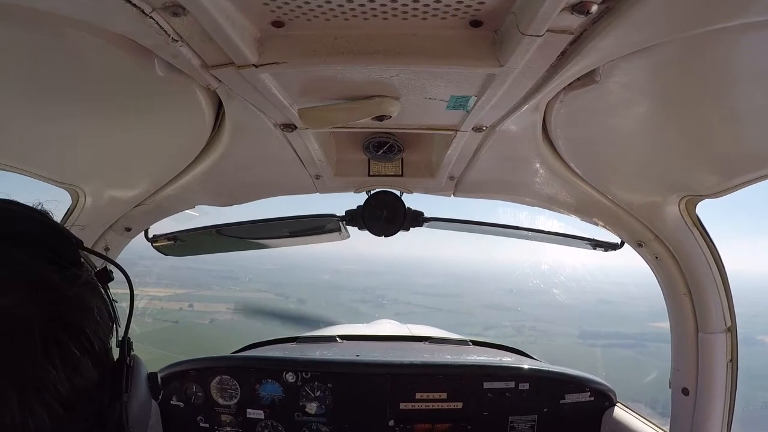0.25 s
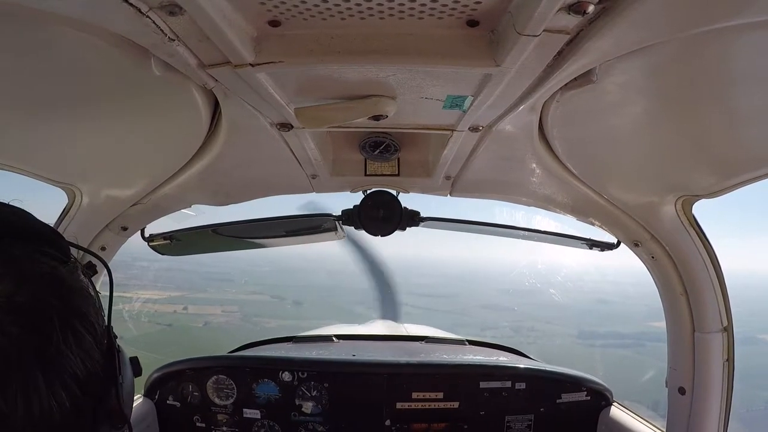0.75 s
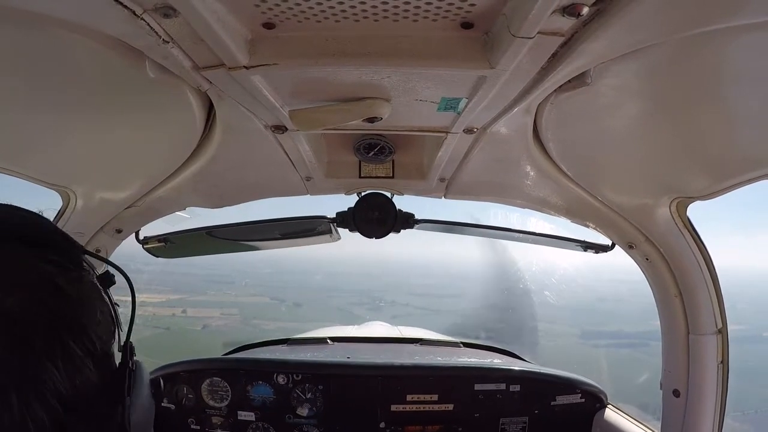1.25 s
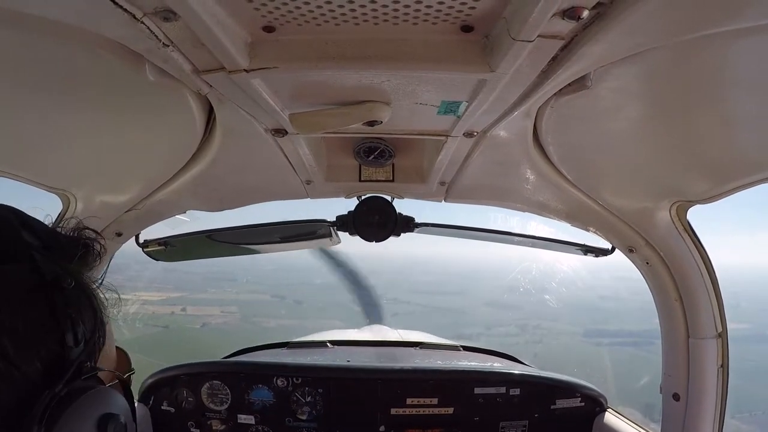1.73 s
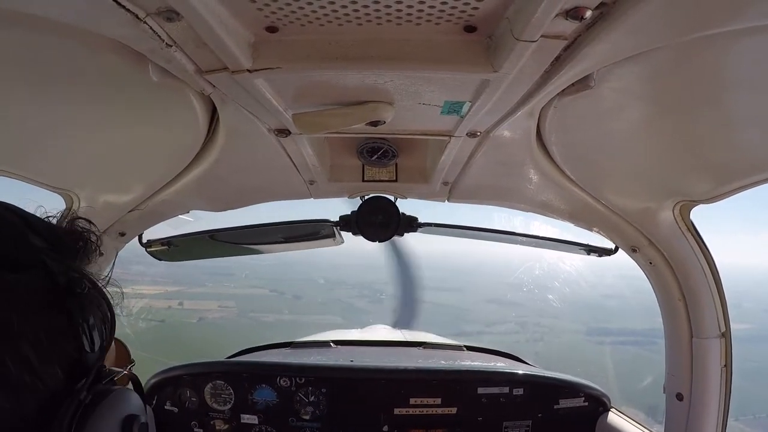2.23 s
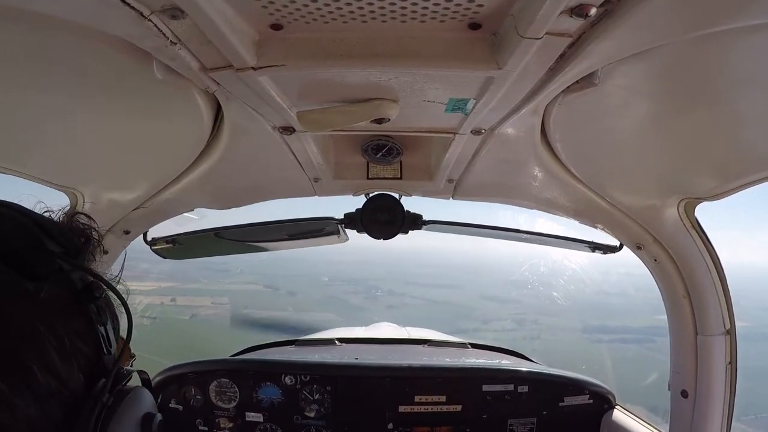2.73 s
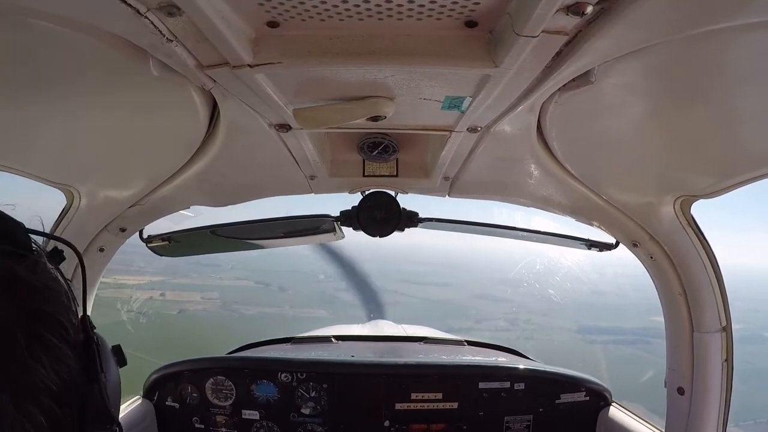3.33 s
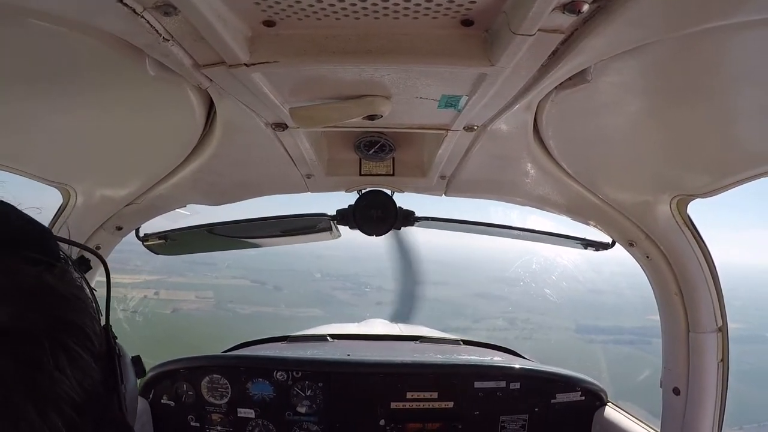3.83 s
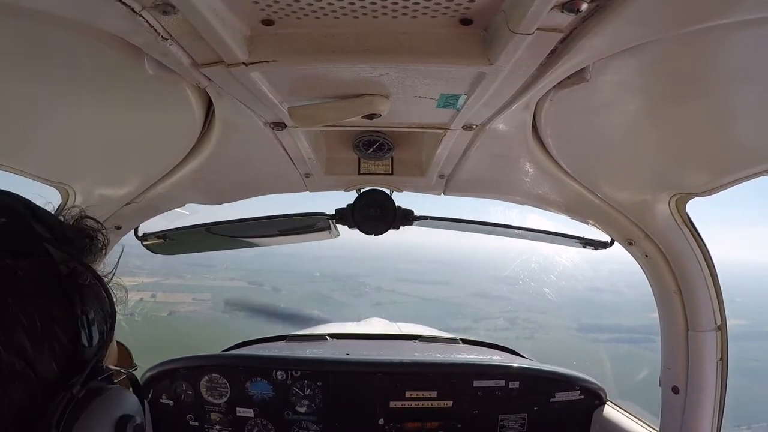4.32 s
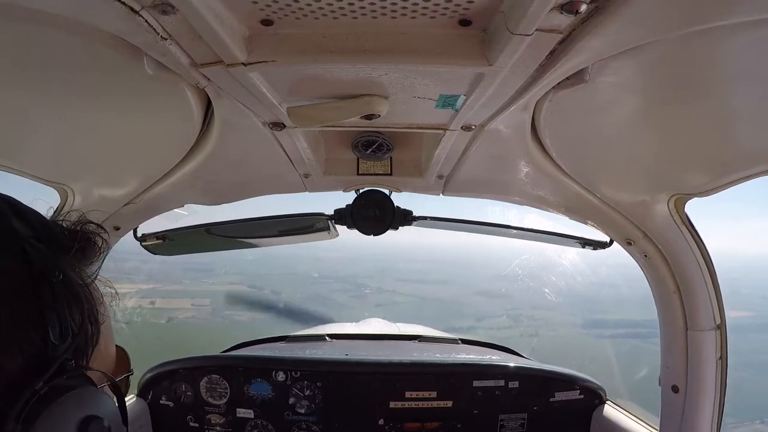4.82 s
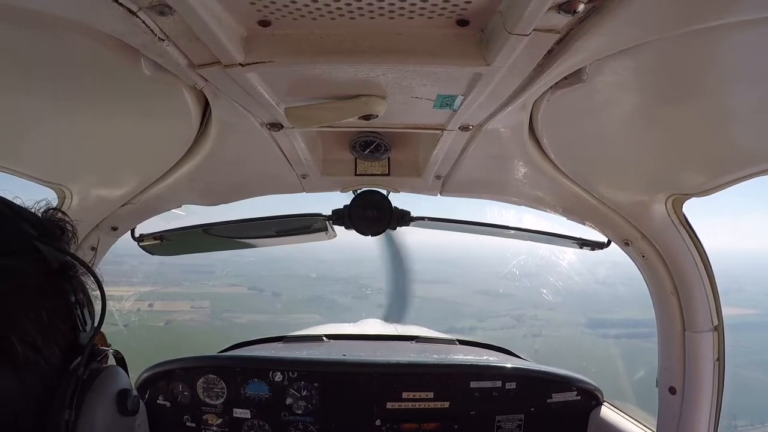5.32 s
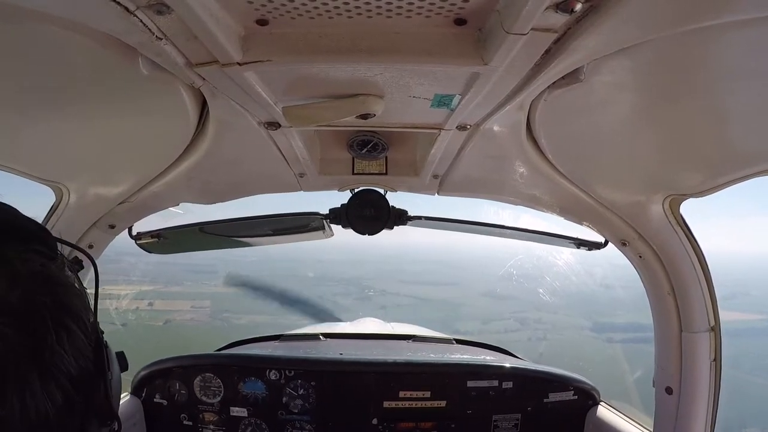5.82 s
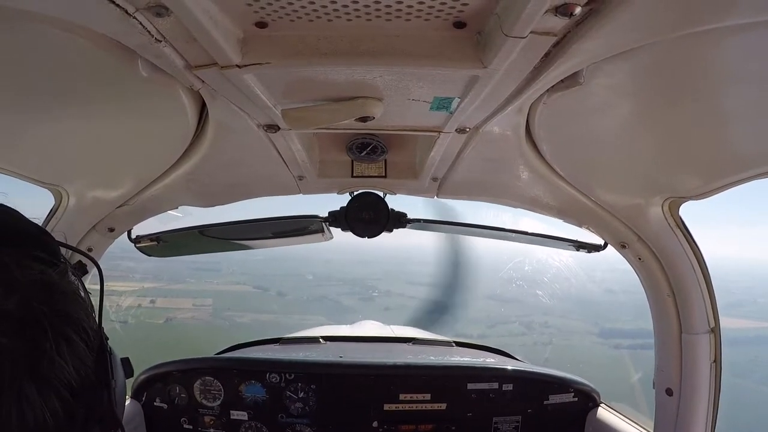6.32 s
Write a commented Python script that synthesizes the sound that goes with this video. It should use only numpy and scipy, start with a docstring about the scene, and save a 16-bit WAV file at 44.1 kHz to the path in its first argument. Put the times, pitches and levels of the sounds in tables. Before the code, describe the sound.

From 0 s the sound is already full: a loud, deep drone from a small aircraft's piston engine and propeller, heard inside the cabin, with a strong low hum near 65 Hz and gently wavering overtones. Around it lie low wind buffeting, a muffled midrange slipstream roar and softer hiss. The drone holds until about 1 s, then slides smoothly down, reaching about 59 Hz near 3 s, pausing briefly, and sinking again from 3.7 s to around 53 Hz by 5 s. It stays there, rising only a hair by the end at 6.5 s. Overtones swell and fade as the pitch slides. Hiss dips around 2 s and recovers by 4.7 s. A hollow panel boom surges irregularly, notably near 0.3, 1.2, 4.4 and 5.4 s. Very faint, high, breathy door-seal whistles sink with the engine. Subsonic rumble grows slightly. The pickup is close and enclosed, without echo.

```python
"""Four-cylinder engine and propeller heard in the cabin of a small aeroplane as the throttle is eased back.
Engine: sines locked to multiples of a sinking firing rate, shaped by cabin nulls and modes.
Slipstream: coloured noise for roar, buffet, lurch and hiss; narrow noise bands for a booming panel.
Faint: door-seal whistles as noise bands that sink with engine speed; swelling top treble."""
import sys
import numpy as np
from scipy import signal
from scipy.fft import rfft, irfft
from scipy.io import wavfile
from scipy.ndimage import uniform_filter1d, minimum_filter1d

SR = 44100
rng = np.random.default_rng(int(sys.argv[2]) if len(sys.argv) > 2 else 0)


def master(y):
    """Save y as 16-bit WAV."""
    cut = np.clip(np.atleast_2d(y).T, -1, 1)
    pcm = np.round(cut * 32767)  # scale
    wavfile.write(sys.argv[1], SR, pcm.astype(np.int16))


def volts(x):
    """Linear amplitude factor 10**(x/20) for a level x in dB, scalar or array-like."""
    e = np.asarray(x, float) / 20
    return 10 ** e


N = 289296


def evened(x):
    """Scales to rms 1."""
    return x / np.sqrt(np.mean(x ** 2) + 1e-20)


def curves(rows):
    """Columns after time_s, interpolated at every sample."""
    time_s, *columns = np.transpose(rows)
    return [np.interp(np.arange(N) / SR, time_s, column) for column in columns]


def wander(top_hz):
    """Slow random curve of rms 1, rolled off above top_hz."""
    spectrum = rfft(rng.standard_normal(N))
    hz = np.arange(len(spectrum)) * SR / N
    return evened(irfft(spectrum / (1 + (hz / top_hz) ** 4), N))


def band(hz, width_hz):
    """Noise of rms 1 through a double pole of width_hz each, shifted up to the curve hz."""
    radius = np.exp(-np.pi * width_hz / SR)
    white = rng.standard_normal(N) + 1j * rng.standard_normal(N)
    lowpassed = signal.lfilter([1], np.convolve([1, -radius], [1, -radius]), white)
    carrier = np.exp(2j * np.pi * np.cumsum(hz * np.ones(N)) / SR)
    return evened((lowpassed * carrier).real)


def noise(points, size, patchy_db):
    """Noise of rms 1 from random short-time spectra: a fixed colour plus drifting patches."""
    frames = 4 * N // size + 5
    bin_hz = np.fft.rfftfreq(size, 1 / SR)
    real, imag, patches = rng.standard_normal((frames, len(bin_hz), 3)).T
    patches = uniform_filter1d(patches, size=16, axis=0)  # across frequency
    patches = evened(uniform_filter1d(patches, size=12, axis=1))  # across time
    pitch_hz, density_db = np.transpose(points)
    colour_db = np.interp(np.log(bin_hz + 1), np.log(pitch_hz + 1), density_db)[:, None]
    spectra = (real + 1j * imag) * volts(colour_db + patchy_db * patches)
    return evened(signal.istft(spectra, nperseg=size, noverlap=3 * size // 4)[1][:N])


def slowing():
    """Engine slowing: 0 at the fast reference speed, 1 at the slow one."""
    firing_hz, = curves(FIRING)
    return (SPEEDS_HZ[-1] - firing_hz) / (SPEEDS_HZ[-1] - SPEEDS_HZ[0])


def level(full_db, slow_db, share):
    """Gain following engine speed (slow_db added at the slowest) and slipstream (share: dB per dB)."""
    air_db, = curves(AIR)
    return volts(full_db + slow_db * slowing() + share * (air_db - air_db.mean()))


# firing rate, two per shaft turn: time_s, firing_hz
FIRING = [(0, 65.2), (.95, 65.0), (1.23, 64.5), (1.5, 63.3), (2.05, 62.3), (2.87, 59.2), (3.28, 58.8),
          (3.69, 58.8), (4.1, 57.0), (4.51, 54.3), (4.8, 53.4), (5.4, 52.8), (5.8, 52.9), (6.15, 53.25),
          (6.56, 53.35)]
# reference firing rates, slow to fast: firing_hz
SPEEDS_HZ = [53, 59, 65]
# engine orders: multiple of firing rate (no unit)
MULTIPLES = [.5, .75, 1, 1.5, 2, 3, 4]
# order levels, one row per multiple: slow_db, middle_db, fast_db
ORDERS = [(-30, -38, -31), (-21.5, -30, -38), (-13, -11.5, -11), (-25, -30, -22), (-18.5, -21, -27.5),
          (-34, -38, -26.5), (-35, -31, -27.5)]
# cabin nulls: centre_hz
NULLS_HZ = [114, 188, 247]
# reach of each null: half_width_hz
NOTCH_HZ = [5, 7, 11]
# cabin modes lifting orders that slide through: centre_hz, half_width_hz, lift_db
CABIN_MODES = [(257.8, 1.7, 7), (122, 4.8, 4.5), (112, 4, 1)]


def engine():
    """Sines locked to firing; uneven cylinders give the fractional orders, turbulence the level waver."""
    null_width_hz = 3
    waver_db, waver_hz = 0.91, 2.4
    firing_hz, = curves(FIRING)
    firings = np.cumsum(firing_hz + 0.12 * wander(top_hz=3)) / SR
    out = np.zeros(N)
    for multiple, order_db in zip(MULTIPLES, ORDERS):
        order_hz = multiple * firing_hz
        lag, dip, lift_db = 0, 1, 0
        # response dips and changes sign across each null
        for null_hz, reach_hz in zip(NULLS_HZ, NOTCH_HZ):
            off_hz = order_hz - null_hz
            lag = lag + np.pi / 2 + np.arctan(off_hz / null_width_hz)
            dip = dip * np.hypot(off_hz, null_width_hz) / np.hypot(off_hz, reach_hz)
        if multiple % 1 > 0:  # fractional orders come by other paths
            lag = lag + 2 * np.pi * rng.random()
        for mode_hz, half_width_hz, peak_db in CABIN_MODES:
            lift_db = lift_db + peak_db / (1 + ((order_hz - mode_hz) / half_width_hz) ** 2)
        speed_db = np.interp(firing_hz, SPEEDS_HZ, order_db)
        rms = dip * volts(speed_db + lift_db + waver_db * wander(waver_hz))
        out += rms * np.sqrt(2) * np.cos(2 * np.pi * multiple * firings + lag)
    return out


# roar spectrum through the skin: pitch_hz, density_db (per Hz)
RUSH = [(260, -15.5), (450, -1.5), (542, -2.5), (615, -6.5), (741, -4), (1090, -7.5), (1200, -6),
        (1910, -13.5), (2250, -14), (3400, -27.5), (4420, -54), (7480, -120)]


def roar():
    """Slipstream noise through the skin, following engine and air."""
    return level(full_db=-29.5, slow_db=0.84, share=0.83) * noise(RUSH, size=1024, patchy_db=-0.12)


# buffet spectrum: pitch_hz, density_db (per Hz)
BUFFET = [(8, -40), (20, -7), (40, 2.5), (60, -1.5), (80, 2.5), (100, 0.5), (135, -2.5), (160, -11),
          (185, -11.5), (230, -8.5), (290, -13.5), (450, -24.5), (600, -36), (900, -79.5)]


def buffet():
    """Low slipstream noise, following the swing of the air."""
    return level(full_db=-17.5, slow_db=-0.18, share=0.98) * noise(BUFFET, size=4096, patchy_db=0.4)


# panel resonances: centre_hz, pole_width_hz, relative_db
PANEL = [(343.3, 44.6, -0.5), (373, 44, -1.5), (409.6, 27.7, -6.5)]
# panel level: time_s, level_db
BOOM = [(0, -29), (.3, -24.5), (.9, -30), (1.2, -24.5), (2.3, -30.5), (2.96, -27), (3.9, -28), (4.4, -25.5),
        (5.1, -28.5), (5.4, -23), (6, -27.5), (6.3, -25), (6.56, -27.5)]


def panel():
    """Panel driven by turbulence: resonant noise bands under a wavering level."""
    waver_db, waver_hz = 1.33, 7
    ringing = evened(sum(volts(relative_db) * band(hz, width_hz) for hz, width_hz, relative_db in PANEL))
    boom_db, = curves(BOOM)
    return volts(boom_db + waver_db * wander(waver_hz)) * ringing


# slipstream strength, heard as hiss: time_s, level_db
AIR = [(0, -36.5), (1.19, -35.5), (2.08, -39), (2.6, -38.5), (3.4, -36.8), (4.7, -35.5), (5, -37),
       (6.56, -37)]
# hiss spectrum: pitch_hz, density_db (per Hz)
HISS = [(2600, -43), (3400, -15.5), (4030, -5.5), (5040, -0.5), (6140, -4.5), (7280, -13), (8870, -10.5),
        (9600, -21), (10400, -27.5), (11500, -34), (15000, -48), (16000, -58)]


def hiss():
    """Slipstream treble noise at the air's own level."""
    air_db, = curves(AIR)
    return volts(air_db) * noise(HISS, size=1024, patchy_db=-0.1)


# lurch spectrum: pitch_hz, density_db (per Hz)
LURCH = [(2, 11), (10, 7.5), (22, 8), (34, 4.5), (60, -46.5)]


def lurch():
    """Patchy noise at the bottom of hearing, stronger as the engine slows."""
    return level(full_db=-38.5, slow_db=6, share=0.3) * noise(LURCH, size=8192, patchy_db=1.5)


# door-seal leaks: full_speed_hz, sag_hz (lost at the slowest), pole_width_hz,
# full_speed_db, slow_db (added at the slowest)
LEAKS = [(9100, 460, 180, -53.5, -0.5), (8260, 450, 370, -53, -6.5), (9400, 350, 140, -57.5, -8)]


def leaks():
    """Door-seal whistles: noise bands that sink with engine speed and flutter at random."""
    flutter_db, flutter_hz = 1.1, 14
    waver_depth_hz, waver_rate_hz = 40, 8
    out = np.zeros(N)
    for full_hz, sag_hz, width_hz, full_db, slow_db in LEAKS:
        gain = level(full_db, slow_db, share=1.7) * volts(flutter_db * wander(flutter_hz))
        pitch_hz = full_hz - sag_hz * slowing() + waver_depth_hz * wander(waver_rate_hz)
        out += gain * band(pitch_hz, width_hz)
    return out


# top treble spectrum: pitch_hz, density_db (per Hz)
TOP = [(10500, -30), (12000, -6), (13000, 0), (15000, 0), (16000, -40)]
# top treble level, swelling now and then: time_s, level_db
TOP_DB = [(0, -72), (.85, -64), (1.0, -74), (2.9, -76), (3.6, -65), (4.5, -62), (4.6, -72), (5.5, -70),
          (5.8, -65), (6.56, -64)]


def top_treble():
    """Faint patchy noise in the highest treble, with slow swells."""
    top_db, = curves(TOP_DB)
    return volts(top_db) * noise(TOP, size=1024, patchy_db=0.7)


def scene():
    """Sum of all sources, one channel."""
    air = roar() + buffet() + panel() + hiss() + lurch() + top_treble()
    return (engine() + air + leaks())[None]


def roll_off(x):
    """The treble ends steeply here."""
    return signal.sosfilt(signal.butter(12, 15140, fs=SR, output="sos"), x)


def record(dry):
    """Fast soft limiter: takes 0.35 dB off per dB of smoothed peak above -4.6 dB."""
    window = 600  # samples
    peak = -minimum_filter1d(-abs(dry), size=window)
    peak = uniform_filter1d(peak, size=window)
    over_db = np.maximum(20 * np.log10(peak + 1e-9) + 4.6, 0)
    mix = dry / volts(0.35 * over_db)
    return roll_off(mix)


dry = scene()
out = record(dry)
master(out)
```